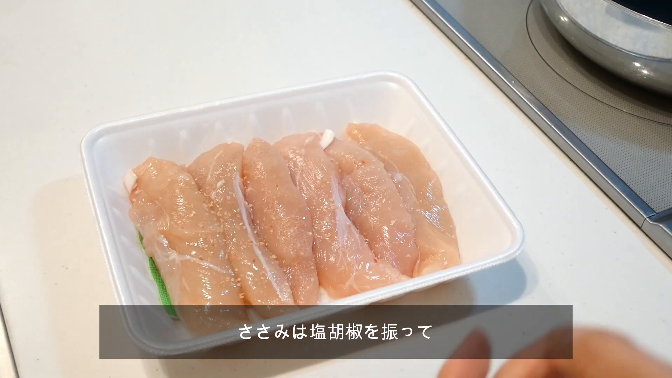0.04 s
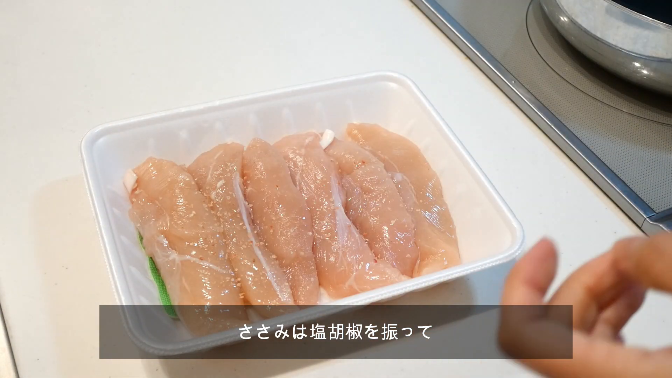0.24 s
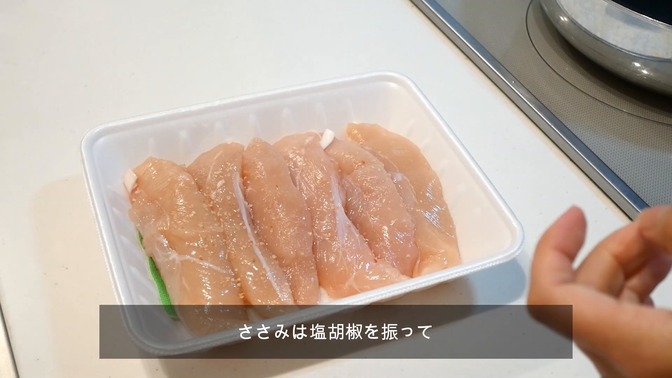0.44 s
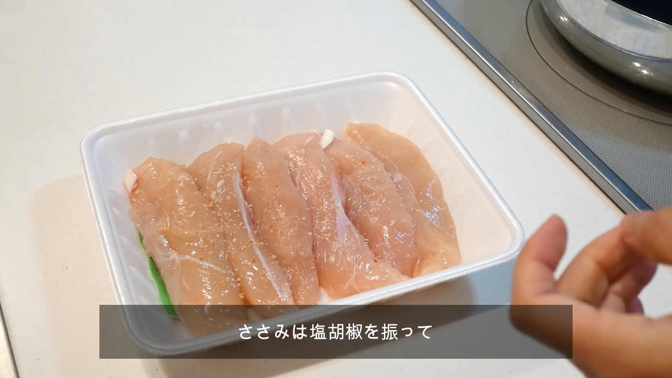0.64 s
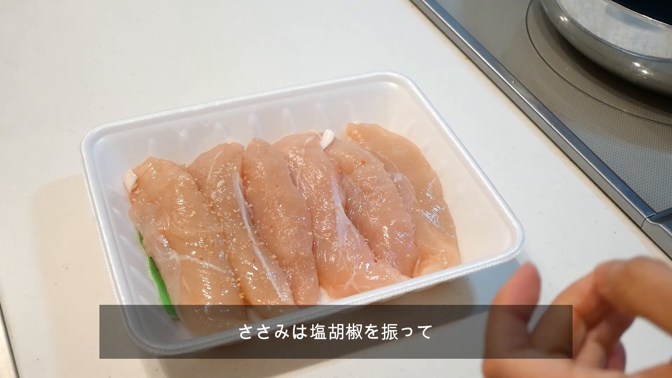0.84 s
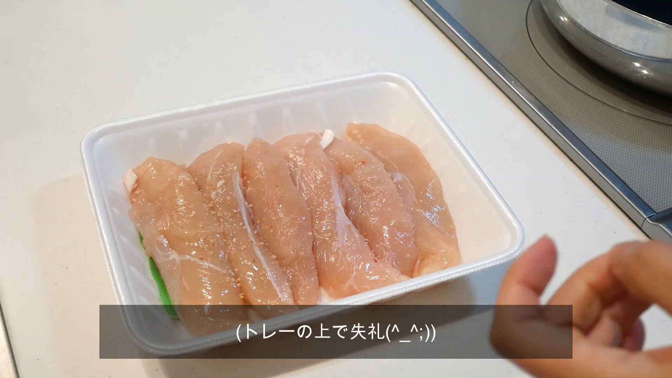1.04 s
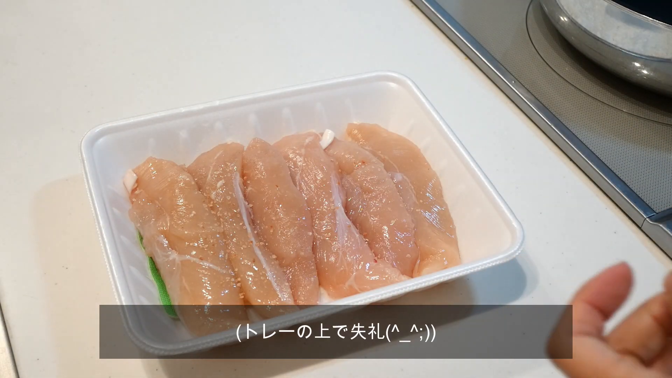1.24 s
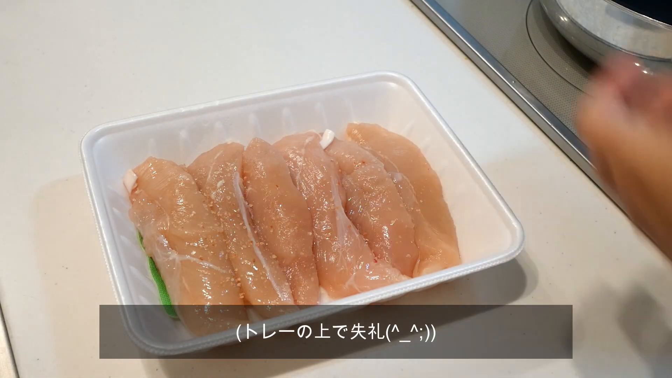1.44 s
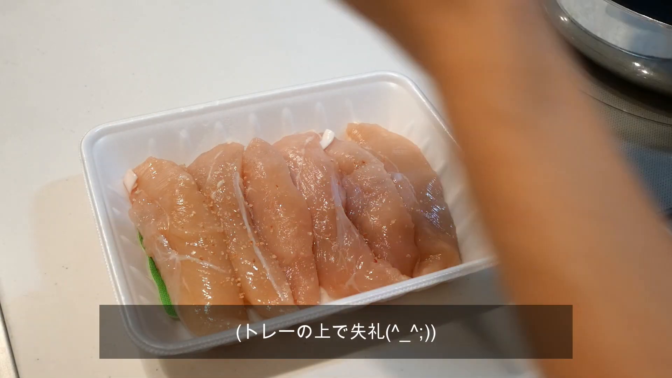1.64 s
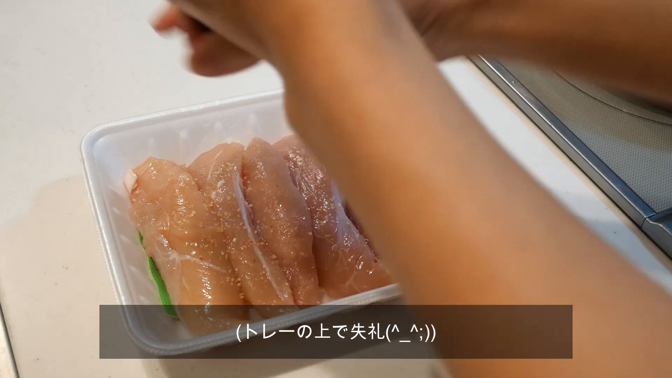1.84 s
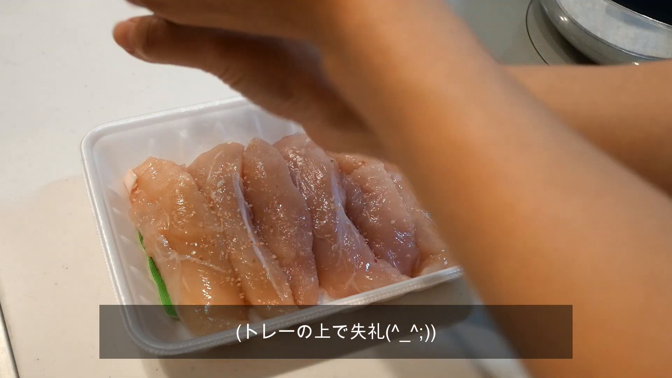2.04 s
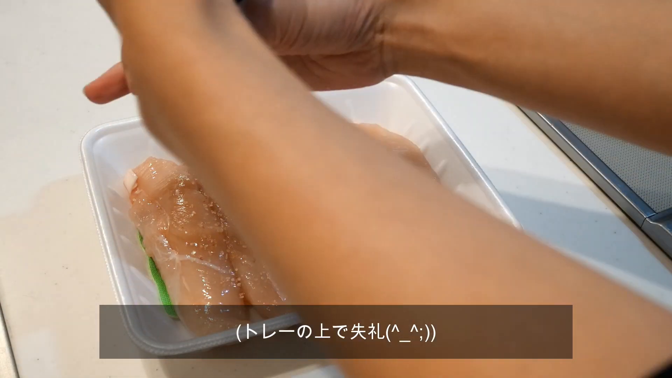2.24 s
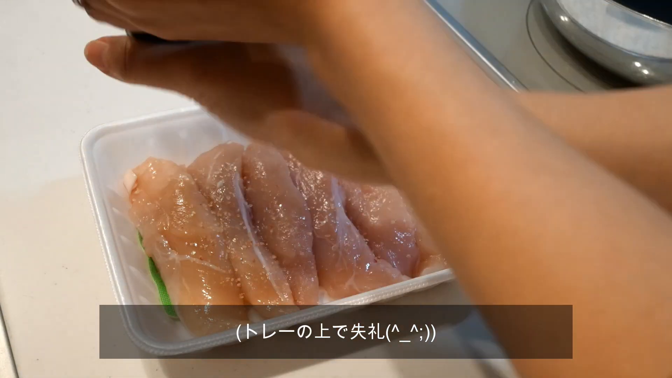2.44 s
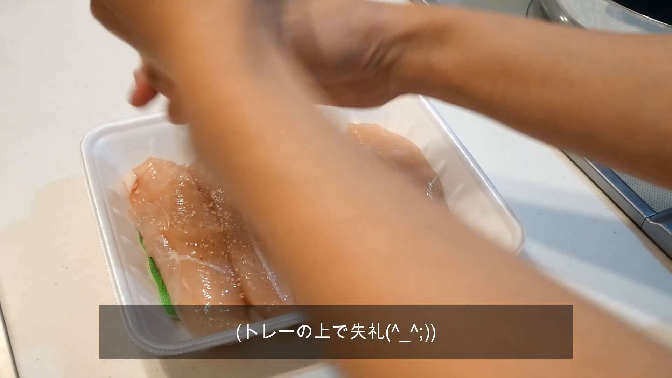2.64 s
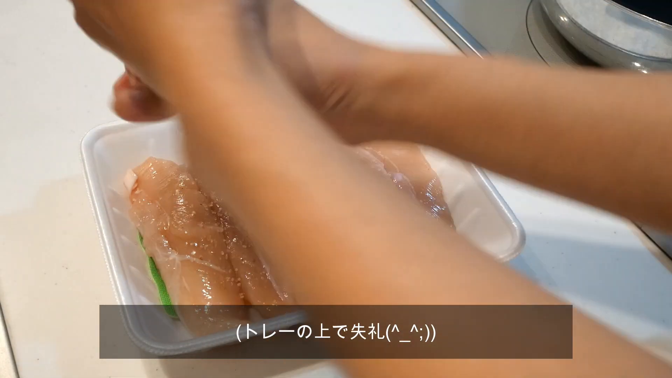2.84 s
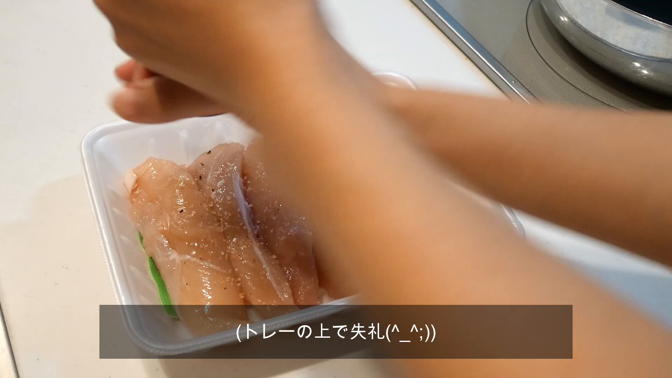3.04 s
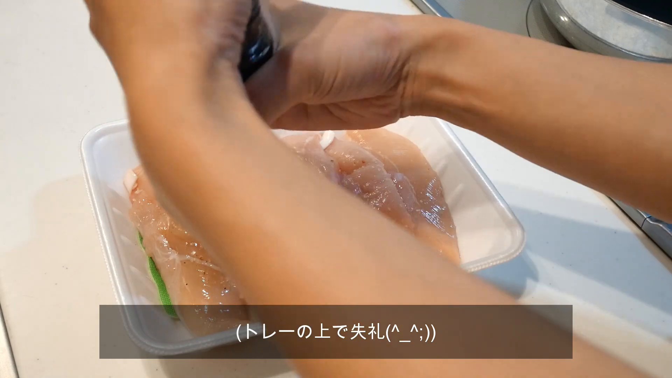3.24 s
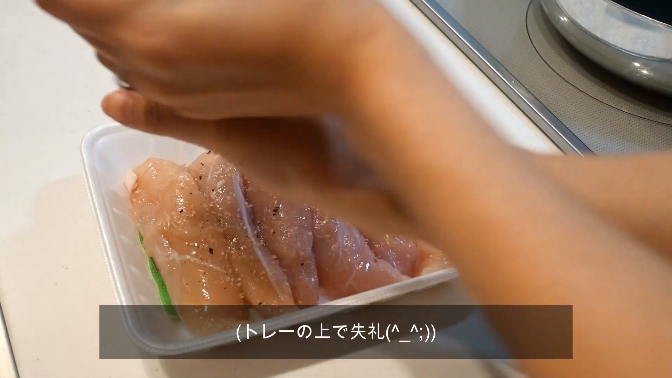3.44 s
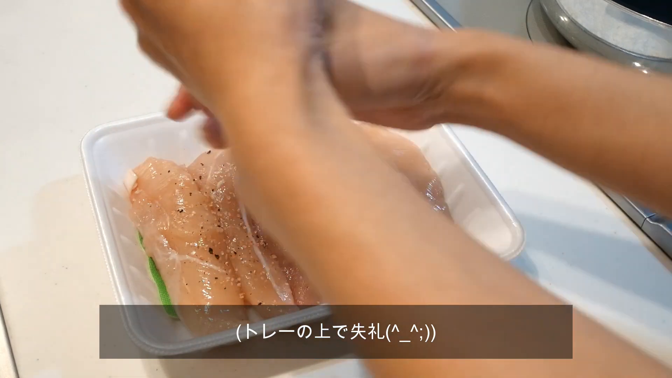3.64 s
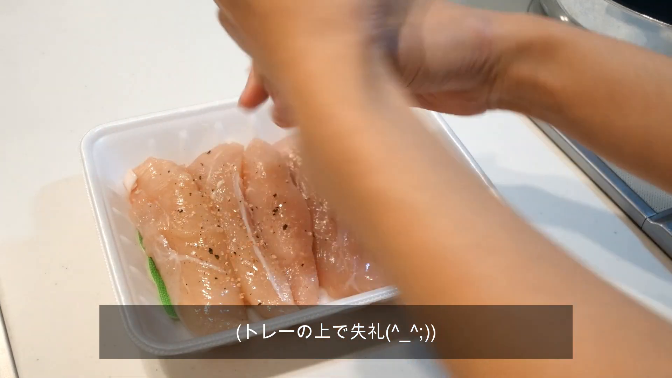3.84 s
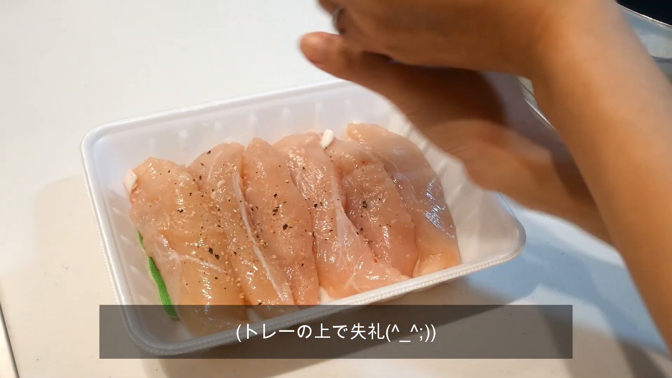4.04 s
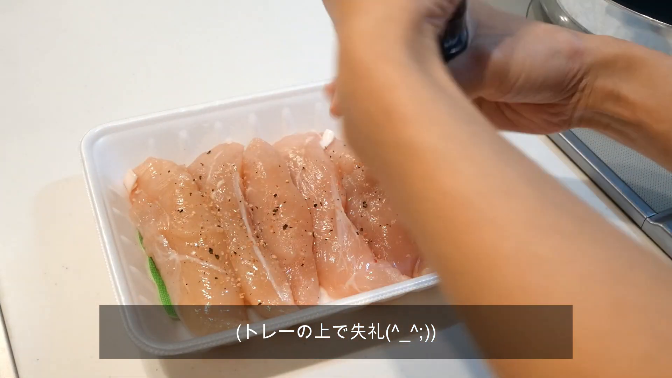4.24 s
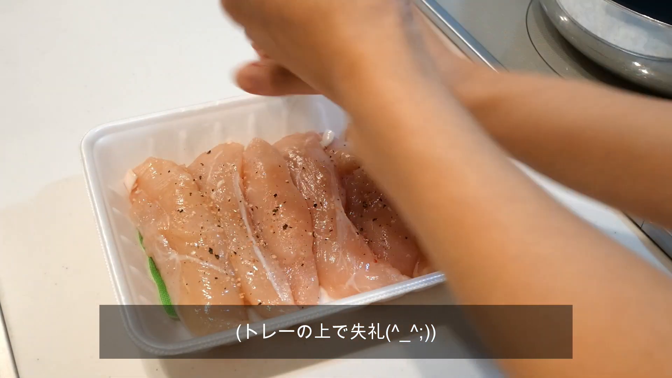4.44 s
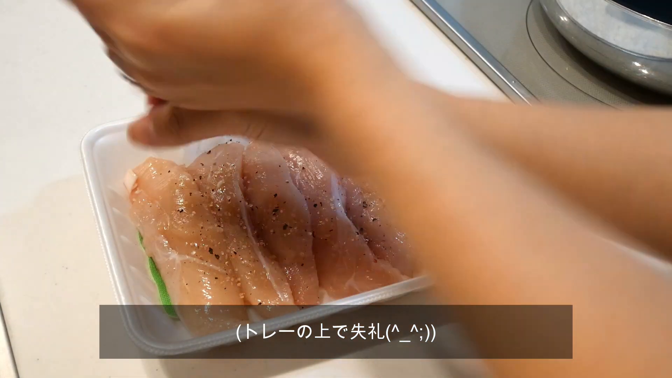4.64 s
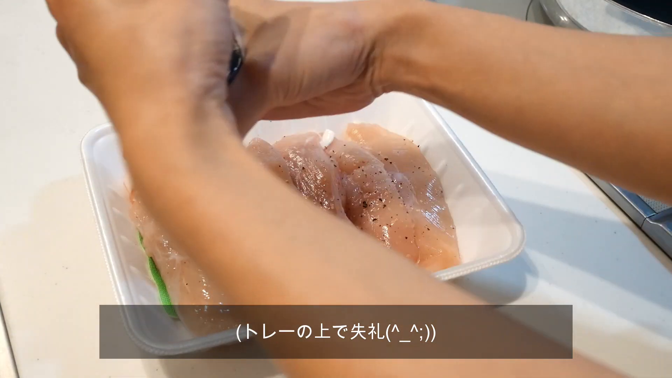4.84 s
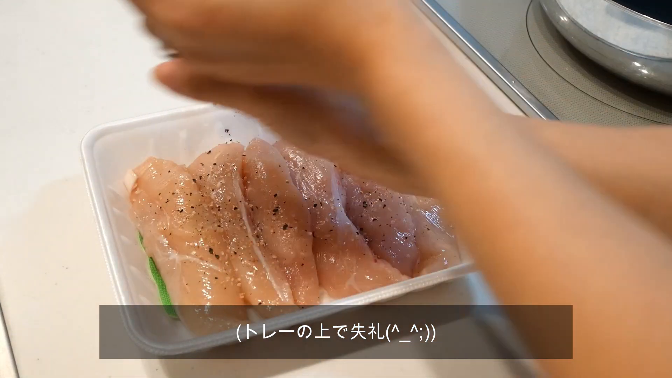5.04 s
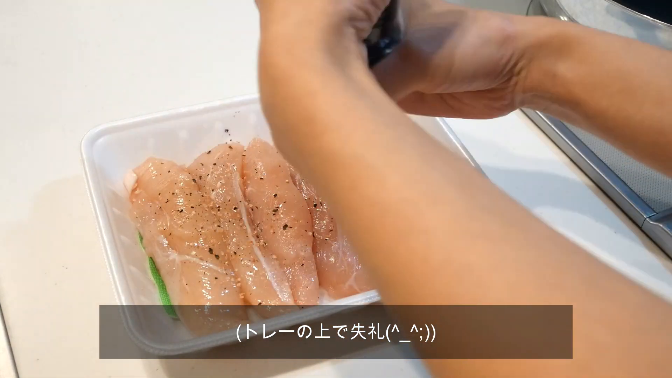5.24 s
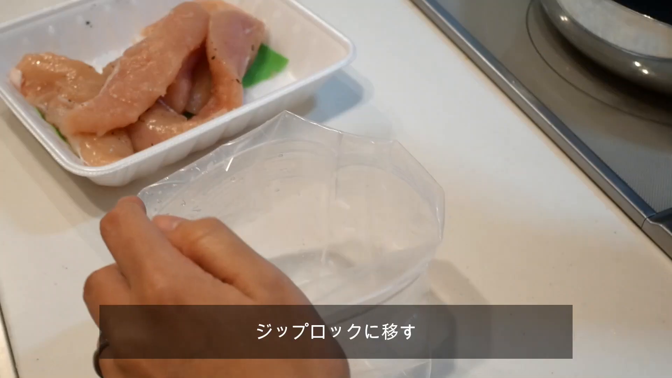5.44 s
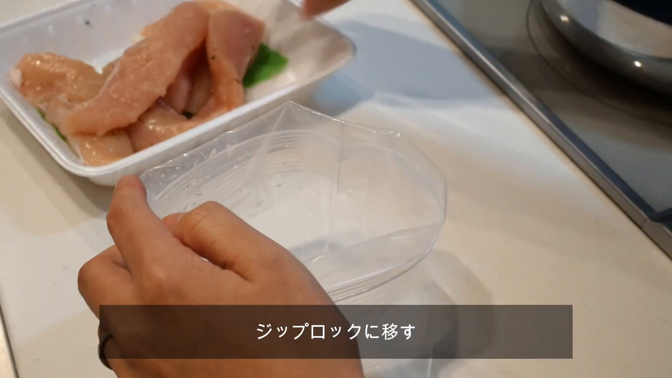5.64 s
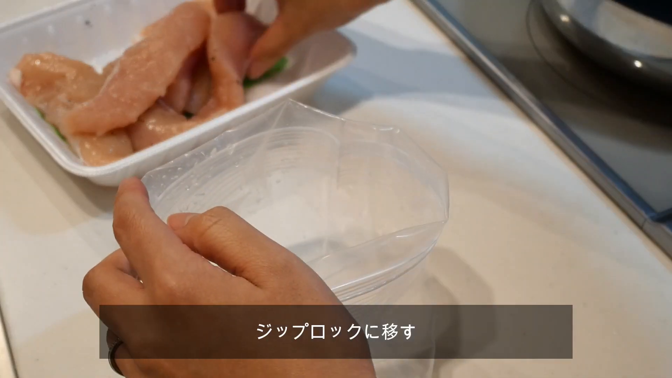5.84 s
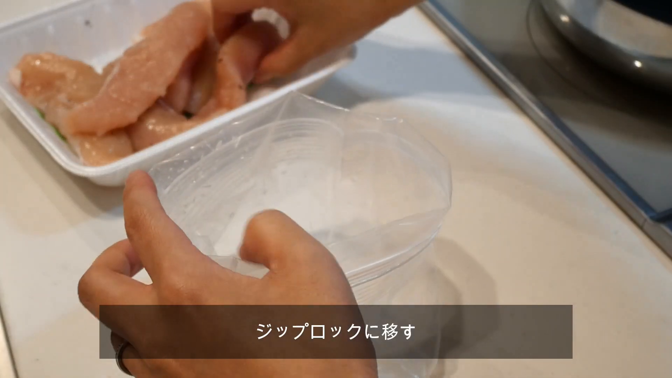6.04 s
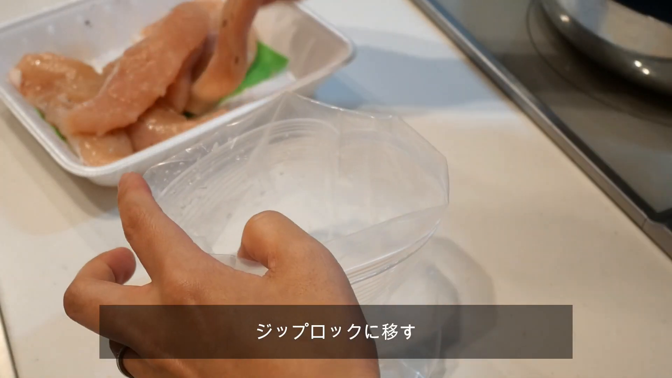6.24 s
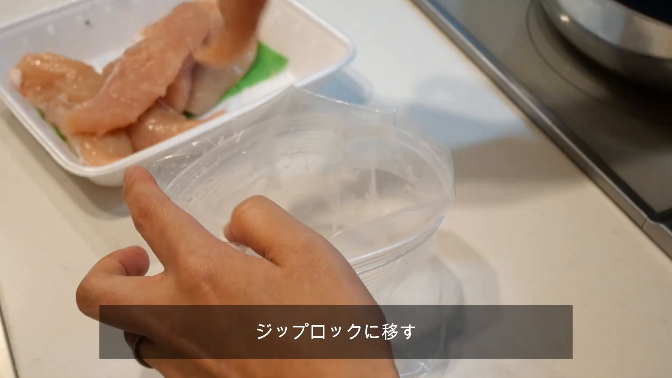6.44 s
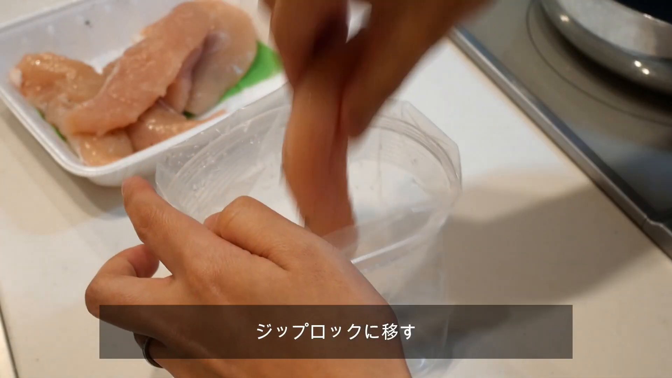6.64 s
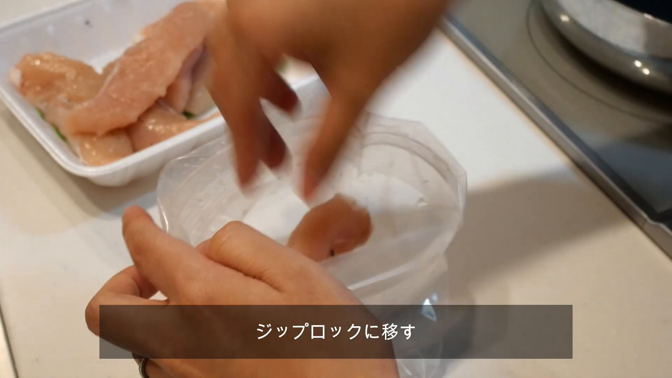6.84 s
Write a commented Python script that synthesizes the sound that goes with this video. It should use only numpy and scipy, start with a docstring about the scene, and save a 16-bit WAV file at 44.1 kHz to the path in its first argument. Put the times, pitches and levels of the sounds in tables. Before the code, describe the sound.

A hand pepper mill grinds close to the microphone in eight short, brittle strokes, each followed by a softer turn back. Before it come a few dull knocks, a faint scrape on a kitchen counter and the hiss of shifting peppercorns. The sound cuts out briefly after the grinding, then returns with light ticks from a plastic bag. A low, quiet ventilation hum fills the small room.

```python
"""Pepper mill in a kitchen

Knocks ring a counter and something is dragged across it. Corns slide in a tipped mill, which is twisted
about twice a second: eight strokes crunch by brittle fracture, with soft friction on the returns. After
a moment of dead silence a plastic bag ticks as its creases buckle. Ventilation hums quietly."""
import sys
import numpy as np
from scipy import signal
from scipy.fft import rfft, irfft
from scipy.io import wavfile
from scipy.ndimage import uniform_filter1d

SR = 44100
rng = np.random.default_rng(int(sys.argv[2]) if len(sys.argv) > 2 else 0)


def store_wav(level_fs):
    """Save 16-bit WAV to argv[1]."""
    pcm = np.round(np.clip(np.atleast_2d(level_fs), -1, 1) * 32767)
    wavfile.write(sys.argv[1], SR, pcm.T.astype(np.int16))


N = 304290
T = np.arange(N) / SR
CUTOFF_HZ = 16000


# Spectra of crushing and of free gliding. Each row: frequency in Hz, spectral density in dB.
CRUNCH_COLOUR = [(100, -20), (350, -14.5), (750, -17.5), (1100, -8), (1700, -3), (2600, 0), (3600, 2),
                 (5200, -2.5), (7500, -4.5), (11000, -7), (15500, -12)]
GLIDE_COLOUR = [(200, -18), (800, -9.5), (1400, 3), (2500, 7.5), (3700, 8), (5200, 4), (8000, -5),
                (15000, -39)]
# Their resonances. Each row: frequency in Hz, width in Hz, level in dB.
CRUNCH_PEAKS = [(361.1, 79, -7.5), (505, 60, -12.5), (1340, 230, -10), (1638, 98, 4), (1830, 130, -1.5),
                (2390, 150, -12), (3130, 67, -12.5), (3370, 130, -3), (4177, 410, -9), (4640, 240, -5.5)]
GLIDE_PEAKS = [(1670, 110, 5)]
def mill():
    """Friction and fracture: lightly loaded burrs glide; past a threshold they crush the grains."""
    body, effort_db = response(CRUNCH_COLOUR, CRUNCH_PEAKS), effort()
    bite = 1 / (1 + from_db(-1.4 * (effort_db + 34)))   # share of the power that goes into crushing
    crushing = grains(effort_db, density=2200, spread_db=2.5, clump_db=8.5) * np.sqrt(bite)
    friction = grains(effort_db, density=12000, spread_db=0, clump_db=5) * np.sqrt(1 - bite)
    bites_s, _, _, tilts_db, *_ = np.transpose(TWISTS)
    crunch = brighten(through(crushing, body), np.interp(T, bites_s, tilts_db), corner_hz=8000)
    glide = through(friction, response(GLIDE_COLOUR, GLIDE_PEAKS))
    brittle = body - low_pass(body, 800)   # a fracture carries little bass
    grinding = from_db(-8) * crunch + from_db(-8.5) * glide
    return grinding + mill_mouth(friction) + chips(brittle) + cracking_corns(brittle)


# Forward twists. Each row: time of full bite and hold in seconds, level and brightness in dB,
# length of the glide before the bite in seconds, its level in dB.
TWISTS = [(1.822, 0.043, -28.5, 9.5, .03, -54), (2.233, 0.023, -35.5, 2, 0.093, -44),
          (2.701, 0.047, -27, 1.5, 0.095, -47.5), (3.16, 0.033, -28.5, 3.5, .04, -56),
          (3.678, 0.026, -24, -4, .07, -50), (4.276, 0.025, -24, 8, .14, -45.5),
          (4.728, 0.068, -35.5, 9, .05, -67), (5.255, 0.039, -23.5, 5, .075, -49.5)]
# Easy turns back. Each row: start and hold in seconds, level in dB, mouth note in Hz, its gain in dB.
RETURNS = [(1.92, 0.13, -43, 1705, -15), (2.388, 0.14, -40.5, 1650, -15), (2.883, 0.15, -41, 1715, -19.5),
           (3.401, 0.12, -39, 1620, -14), (3.913, 0.14, -39.5, 1655, -17),
           (4.412, 0.21, -45.5, 1640, -12.5), (4.984, 0.11, -40, 1635, -15)]
TWIST_DB_PER_S = (382.5, 269.5)   # rise, fall
def effort():
    """The load on the burrs, in dB, is the power sum of twists, glides and crumbs being ground."""
    twists = [db + push_db(T - s, hold, *TWIST_DB_PER_S) for s, hold, db, *_ in TWISTS]
    take_ups = [(s - lead, lead, db) for s, *_, lead, db in TWISTS]
    glides = [db + glide_db(T - s, hold) for s, hold, db, *_ in list(RETURNS) + take_ups]
    broken = np.zeros(N)
    for s, db, _ in CORN_CRACKS:
        broken[int(s * SR)] += from_db(db - 15.5) ** 2
    decay = from_db(-520 / SR) ** 2   # the crumbs fade at 520 dB per second
    crumbs = 10 * np.log10(signal.lfilter([1], [1, -decay], broken + 1e-18))
    return power_sum(twists + glides + [crumbs])


def glide_db(t, hold_s):
    """Friction noise grows with speed, so a free turn peaks midway, where the hand is fastest."""
    slowness = 1 - np.sin(np.pi * np.clip(t / hold_s, 0, 1))
    return push_db(t, hold_s, rise_db_per_s=1200, fall_db_per_s=400) - 7 * slowness


# Whole corns breaking. Each row: start in seconds, relative level in dB, brightness in dB.
CORN_CRACKS = [(2.1972, -26, 5), (2.232, -19, -9), (2.2467, -15, -6), (2.6448, -31, 0), (2.658, -26.5, 4),
               (2.687, -28, -11), (2.7016, -16.5, -9), (2.731, -12, -13), (2.754, -18, -7),
               (3.12, -25.5, -7), (3.125, -23, -9), (3.138, -24, 8), (3.146, -15.5, 4), (3.159, -17, -1),
               (3.188, -20.5, -6), (3.1927, -12.5, -5.5), (3.6328, -26, -2), (3.6523, -10, -4.5),
               (3.6588, -5, -2), (3.676, -15, 9), (3.7413, -9.5, -4), (3.7552, -9, 2.5), (4.1831, -26, 0),
               (4.2015, -30.5, 8.5), (4.21, -13, 9), (4.216, -25, -1.5), (4.2554, -8, 9.5),
               (4.273, -4.5, -1), (4.518, -38, -12), (4.7229, -29, -11), (4.7356, -13, 10),
               (4.7612, -17.5, -19.5), (4.767, -19.5, 13), (4.778, -18, 3.5), (4.803, -22.5, 21.5),
               (4.8154, -12, 14), (5.206, -26.5, 19), (5.2244, -21.5, -1.5), (5.249, -9, -3.5),
               (5.2765, -12.5, 19.5)]
# Modes of the hand-held mill. Each row: frequency in Hz, level in dB, T60 in seconds.
JOLT_MODES = [(355, -3.5, 0.053), (420, -5.5, 0.025), (505, -5.5, 0.035), (830, -6, 0.03)]
def cracking_corns(body):
    """Brittle fracture releases the load at once; a big corn giving way shakes the whole mill."""
    out = np.zeros((2, N))
    for s, db, bright_db in CORN_CRACKS:
        add(out, s, snap(body, db - 5.5, bright_db, length_s=0.001))
        jolt = ringing(JOLT_MODES, spread_db=1.5, detune=0.05, count=4000)   # the grip varies the modes
        jolt_db = 1.57 * db - 0.52 * bright_db - 24.5
        add(out, s, from_db(jolt_db) * low_pass(jolt, 820, order=2))
    return out


def chips(body, per_twist=4):
    """Small fractures fall at random around each bite, weaker while the load is still building."""
    out = np.zeros((2, N))
    for s, hold, db, *_ in TWISTS:
        for t in rng.uniform(-0.03, hold, per_twist):
            grip_db = push_db(t, hold, *TWIST_DB_PER_S)
            add(out, s + t, snap(body, db + 0.5 + grip_db, bright_db=3.5, length_s=0.001))
    return out


def mill_mouth(friction, width_hz=70):
    """Cavity resonance: friction rings the air in the mill's mouth, at a note that shifts with grip."""
    s, hold, _, hz, db = np.transpose(RETURNS)
    note_hz, gain_db = np.interp(T, s + hold / 2, hz), np.interp(T, s + hold / 2, db)
    carrier = np.exp(2j * np.pi * np.cumsum(note_hz) / SR)
    ring = np.real(low_pass(friction / carrier, width_hz / 2) * carrier)   # a moving band-pass
    return from_db(gain_db) * ring * 2 * np.sqrt(SR / (np.pi * width_hz))


# Spectrum of the jar wall. Each row: frequency in Hz, spectral density in dB.
JAR_COLOUR = [(300, -29), (1200, -15), (2000, -14), (3000, -5), (4200, 1), (5100, -0.5), (6200, -0.5),
              (7500, -8.5), (9500, -6.5), (15500, -14)]
# Its resonances. Each row: frequency in Hz, width in Hz, level in dB.
JAR_PEAKS = [(3300, 250, -15), (5050, 250, -2), (7300, 1100, -8)]
# The heap shifting. Each row: time of full flow, rise and hold in seconds, relative level in dB.
CORN_SLIDES = [(1.35, 0.056, 0.059, -40.5), (1.481, 0.044, 0.022, -43.5), (1.63, 0.26, 0.083, -49.5),
               (1.72, 0.0074, .008, -33.5), (1.775, 0.0046, 0.097, -28.5), (3.503, 0.07, 0.048, -47.5),
               (4.433, .06, 0.036, -47.5), (4.671, 0.0058, 0.02, -44.5), (4.75, 0.027, 0.051, -41.5)]
# Single corns hitting the wall. Each row: start in seconds, relative level in dB.
CORN_DROPS = [(1.325, -45), (1.633, -33), (1.6587, -35.5), (1.952, -41), (2.114, -43.5), (2.314, -32.5),
              (3.5795, -28.5), (3.612, -31.5), (4.417, -30), (4.657, -40), (4.681, -30), (4.69, -28),
              (4.869, -25), (5.133, -40.5), (5.186, -34.5), (5.346, -29), (5.419, -35)]
def jar():
    """Granular flow: the many impacts of sliding corns merge into a hiss; single ones tick."""
    wall = response(JAR_COLOUR, JAR_PEAKS)
    flow_db = power_sum([db + push_db(T - s, hold, rise_db_per_s=15 / rise, fall_db_per_s=233)
                         for s, rise, hold, db in CORN_SLIDES])
    out = from_db(-7) * through(grains(flow_db, density=14000, spread_db=0, clump_db=4.5), wall)
    for s, db in CORN_DROPS:
        add(out, s, snap(wall, db - 5.5, bright_db=3, length_s=0.00099))
    return out


# Blows on the counter. Each row: start in seconds, relative level in dB, cut-off in Hz, click in dB.
COUNTER_KNOCKS = [(0.1975, -22, 1280, -24.5), (0.204, -41, 790, -47), (0.248, -31, 400, -65),
                  (0.286, -20.5, 377, -31), (0.514, -42, 400, -68), (1.002, -41.5, 800, -47.5)]
# Modes of the counter and of a hollow object. Each row: frequency in Hz, level in dB, T60 in seconds.
COUNTER_MODES = [(65.4, -15, 0.15), (146, -12.5, 0.09), (267.4, -8.5, 0.13), (291.6, 1, 0.087),
                 (334, 1, 0.05), (367, -9.5, 0.08), (482, -7.5, 0.09), (517, -9, 0.06), (554, 2.5, 0.076),
                 (688, -6.5, 0.077), (855, -16.5, 0.07), (970, -22, 0.08)]
BUMP_MODES = [(112.5, -14, 0.35), (264, -8, 0.16), (310, 3.5, 0.11), (432, -0.5, 0.11)]
# Spectrum of a contact. Each row: frequency in Hz, spectral density in dB.
CLICK_COLOUR = [(60, 0.5), (250, 8.5), (900, 3), (1600, -5.5), (2700, -4), (4200, -4.5), (7000, -16.5),
                (15000, -24.5)]
# A brief scuff. Each row: time in seconds, relative level in dB.
SCUFF_LEVELS = [(0.998, -65), (1.008, -52.5), (1.035, -59), (1.05, -54), (1.085, -62), (1.15, -62.5),
                (1.2, -88)]
def knocks():
    """Soft impacts excite mainly low modes, each with a click; one scuffs on into a hollow bump."""
    ring, click = ringing(COUNTER_MODES), response(CLICK_COLOUR)
    scuff = grains(curve(SCUFF_LEVELS), density=7200, spread_db=5.5, clump_db=5.5)
    out = from_db(-2) * through(scuff, click)
    for s, db, soft_hz, click_db in COUNTER_KNOCKS:
        add(out, s, from_db(db - 8) * low_pass(ring, soft_hz, order=2))
        add(out, s, snap(click, click_db, bright_db=0, length_s=0.0047))
    bump_s = 1.092
    add(out, bump_s, from_db(-41) * low_pass(ringing(BUMP_MODES), 530, order=2))
    add(out, bump_s, snap(click, db=-46, bright_db=0, length_s=0.0038))
    return out


# Something drawn across the counter. Each row: time in seconds, relative scrape and ring levels in dB.
DRAG_LEVELS = [(0.25, -79, -70), (0.36, -55, -49), (0.42, -58, -49.5), (0.48, -57.5, -68),
               (0.525, -53, -50.5), (0.59, -56.5, -47), (0.62, -57, -59.5), (0.7, -63.5, -61),
               (0.99, -101, -77)]
# Spectrum of the scrape. Each row: frequency in Hz, spectral density in dB.
SCRAPE_COLOUR = [(300, 5), (1100, 0.5), (1700, -8), (2700, -8), (4200, -8.5), (7000, -13.5), (15000, -25)]
# Its resonances. Each row: frequency in Hz, width in Hz, level in dB.
SCRAPE_PEAKS = [(1295, 430, -11.5), (2150, 170, -7.5), (2960, 200, -7.5), (3404, 210, -2.5),
                (4700, 250, -12)]
def drag_scrape():
    """Sliding friction: a dense train of tiny contacts makes a faint scrape."""
    contacts = grains(curve(DRAG_LEVELS), density=8100, spread_db=0.5, clump_db=0)
    return from_db(-3) * through(contacts, response(SCRAPE_COLOUR, SCRAPE_PEAKS))


def drag_ring():
    """Friction sustains one mode, unsteady in pitch and strength because it grips unevenly."""
    pitch_hz = 652 + 5.5 * wander(20)
    level_db = curve(DRAG_LEVELS, column=2) + 2.5 * wander(45.4)
    return np.sin(2 * np.pi * np.cumsum(pitch_hz) / SR) * from_db(level_db)


# Spectrum of the plastic film. Each row: frequency in Hz, spectral density in dB.
FILM_COLOUR = [(150, -17), (700, -19.5), (1100, -5.5), (1600, -13), (3200, -4), (4800, -2), (7000, -8.5),
               (10000, -14.5), (15000, -19)]
# Its rustle under the fingers. Each row: time in seconds, relative level in dB.
RUSTLE_LEVELS = [(5.63, -70), (5.8, -74), (5.95, -78), (6.13, -74), (6.45, -72), (6.65, -83), (6.76, -71),
                 (6.9, -56)]
# Creases flipping over. Each row: start in seconds, relative level in dB, brightness in dB.
CREASE_SNAPS = [(6.079, -56, -12), (6.1368, -48.5, -5), (6.224, -52, 12), (6.321, -55, -20),
                (6.767, -59, 3), (6.8214, -23.5, -17), (6.829, -39, 17), (6.855, -36, -6),
                (6.8602, -21, -11)]
def bag():
    """Buckling: thin plastic rustles faintly, and single creases snap through with a tick."""
    film = response(FILM_COLOUR)
    contacts = grains(curve(RUSTLE_LEVELS), density=9000, spread_db=0.5, clump_db=5)
    out = from_db(-9.5) * brighten(through(contacts, film), 6.7)
    for s, db, bright_db in CREASE_SNAPS:
        add(out, s, snap(film, db - 5, bright_db, length_s=0.0012))
    return out


# Spectrum of the ventilation. Each row: frequency in Hz, spectral density in dB.
AIR_COLOUR = [(15, -26), (25, -12.5), (74, -15), (108, 0.5), (130, -21.5), (180, -4), (217, -12), (309, -4),
              (373, -9), (463, -6.5), (659, -14.5), (1040, -16.5), (1190, -23.5), (5280, -33),
              (16000, -37.5)]
def ventilation():
    """Moving air gives steady broadband noise, and the motor adds a wavering tone."""
    noise = ports(rng.standard_normal((2, N)), split_hz=1200)
    air = rms_one(through(noise, response(AIR_COLOUR, size=8192)))
    hum_hz = 111.4 + 2.7 * wander(2)
    hum = np.sqrt(2) * np.sin(2 * np.pi * np.cumsum(hum_hz) / SR)
    return from_db(-60.5) * air + from_db(-75.5) * hum


# Decay of the kitchen. Each row: frequency in Hz, T60 in seconds.
ROOM_T60 = [(150, 0.32), (600, 0.26), (2000, 0.21), (6000, 0.28), (15000, 0.27)]
# Reflections from counter and wall. Each row: nominal delay in seconds, left gain, right gain.
EARLY_ECHOES = [(.0068, .22, 0.15), (.0085, -0.19, 0.25)]
def room_response(wet_db, count=22050):
    """Reverberation: early reflections and a diffuse tail, coherent between ports only in the bass."""
    t, tail = np.arange(count) / SR, 0
    noise, hz = rfft(rng.standard_normal((2, count))), np.fft.rfftfreq(count, 1 / SR)
    edges_hz = 30 * 2.0 ** np.arange(11)
    for low, high in zip(edges_hz, edges_hz[1:]):
        mid, side = irfft(noise * ((hz >= low) & (hz < high)), count)
        centre = np.sqrt(low * high)
        alike = 1 / (1 + (centre / 2600) ** 2)
        band = np.sqrt((1 + alike) / 2) * mid + np.sqrt((1 - alike) / 2) * side * np.array([[1], [-1]])
        tail = tail + band * from_db(-60 * t / at_hz(ROOM_T60, centre))
    impulse = from_db(wet_db) * rms_one(tail * np.clip(t / 0.0011, 0, 1)) / np.sqrt(count)
    for delay, left, right in EARLY_ECHOES:
        impulse[:, int(delay * rng.uniform(0.93, 1.07) * SR)] += [left, right]
    return impulse


def kitchen(x, wet_db, paths=4):
    """Room paths depend on position: as the hands move, the sound crossfades through several sets."""
    out, place = x, 2.7 * T
    for k in range(paths):
        away = np.minimum(np.abs((place - k + paths / 2) % paths - paths / 2), 1)
        out = out + through(x * np.cos(np.pi / 2 * away), room_response(wet_db))
    return out


def grains(level_db, density, spread_db, clump_db):
    """Shot noise: clumped random contacts, density per second at -36.5 dB and more when louder."""
    rate = density * from_db(0.38 * (level_db + 36.5))
    born = rng.random(N) < rate / SR
    clumps = from_db(clump_db * wander(69))
    sizes = born * clumps * from_db(spread_db * np.minimum(rng.exponential(1, N), 4))
    local_rms = np.sqrt(np.abs(uniform_filter1d(sizes ** 2, size=900)) + 1e-4)
    return ports(sizes / local_rms * rng.choice([-1, 1], (2, N))) * from_db(level_db)


def snap(body, db, bright_db, length_s, count=1400):
    """Impulsive excitation: a noise burst rings a body, with the energy of level db held for 1.5 ms."""
    t = np.arange(count) / SR
    noise = ports(rng.standard_normal((2, count)), split_hz=6500)
    burst = noise * np.sqrt(t / length_s) * np.exp(-t / length_s)
    sound = low_pass(brighten(through(burst, body), 1.2 * bright_db), 11000)
    return from_db(db) * rms_one(sound) * np.sqrt(0.0015 * SR / count)


def ringing(modes, spread_db=0, detune=0, count=13000):
    """Damped modes: pressure follows the surface's acceleration, so each starts at its peak."""
    t = np.arange(count) / SR
    return sum(from_db(db + spread_db * a - 60 * t / t60) * np.cos(2 * np.pi * hz * (1 + detune * b) * t)
               for (hz, db, t60), (a, b) in zip(modes, rng.standard_normal((len(modes), 2))))


def response(colour, resonances=(), size=2048):
    """Minimum-phase, unit-energy impulse response of a body with a broad colour and resonant peaks."""
    hz = np.fft.rfftfreq(size, 1 / SR)
    power = from_db(at_hz(colour, hz)) ** 2
    for centre, width, db in resonances:
        power += 4 * from_db(db) ** 2 / (1 + ((hz - centre) / width) ** 2) ** 2
    power /= 1 + (hz / CUTOFF_HZ) ** 40
    cepstrum = irfft(np.log(power) / 2)
    cepstrum[1:size // 2] *= 2   # folding the cepstrum makes the response causal
    cepstrum[size // 2 + 1:] = 0
    impulse = irfft(np.exp(rfft(cepstrum)))
    return impulse / np.linalg.norm(impulse)


def ports(draws, split_hz=5000):
    """Coherence falls with frequency: two microphone ports share the bass and differ in the treble."""
    side = draws[1] - low_pass(draws[1], split_hz)
    return draws[0] + 1.14 * side * np.array([[1], [-1]])


def push_db(t, hold_s, rise_db_per_s, fall_db_per_s):
    """Exponential attack up to t = 0, a hold at 0 dB, exponential release."""
    return np.maximum(rise_db_per_s * np.minimum(t, 0) - fall_db_per_s * np.maximum(t - hold_s, 0), -140)


def power_sum(levels_db):
    """Incoherent sources add in power."""
    return 10 * np.log10(sum(from_db(db) ** 2 for db in levels_db) + 1e-14)


def wander(hz):
    """Low-passed random fluctuation of unit rms."""
    return rms_one(low_pass(rng.standard_normal(N), hz, order=2))


def brighten(x, db, corner_hz=3200):
    """Spectral tilt of treble against bass about a corner."""
    low = low_pass(x, corner_hz)
    return low * from_db(-db / 2) + (x - low) * from_db(db / 2)


def low_pass(x, hz, order=1):
    """Maximally flat low-pass."""
    return signal.sosfilt(signal.butter(order, hz, fs=SR, output="sos"), x)


def through(x, impulse):
    """Convolution of stereo sound with an impulse response."""
    return signal.fftconvolve(x, np.atleast_2d(impulse), axes=-1)[:, :x.shape[-1]]


def add(out, s, sound):
    """Superposition of a sound starting at s seconds."""
    i = int(round(s * SR))
    out[:, i:i + sound.shape[-1]] += sound[..., :N - i]


def curve(rows, column=1):
    """A level curve in dB, silent outside its span."""
    rows = np.array(rows)
    return np.interp(T, rows[:, 0], rows[:, column], left=-140, right=-140)


def at_hz(points, hz):
    """Interpolation on a log-frequency axis."""
    points = np.array(points)
    return np.interp(np.log(np.maximum(hz, 1)), np.log(points[:, 0]), points[:, 1])


def from_db(db):
    """Decibels to gain."""
    return 10 ** (np.asarray(db) / 20)


def rms_one(x):
    """Scaling to unit rms."""
    return x / np.sqrt(np.mean(x ** 2) + 1e-20)


def scene():
    """Level differences give direction: the mill's treble leans left, the counter sounds right."""
    pepper = brighten(mill() + jar(), np.array([[1.0], [-1.0]])) * from_db([[0.1], [-0.1]])
    near = pepper + bag()
    counter = (knocks() + drag_scrape()) * from_db([[-0.9], [0.9]])
    return kitchen(near, wet_db=-3) + kitchen(counter, wet_db=0.5) + drag_ring() + ventilation()


def record(dry):
    """Gating and band-limiting: the sound drops out for 0.2 s, and the top treble is cut."""
    gate = uniform_filter1d(((T < 5.432) | (T > 5.632)) * 1.0, size=128)
    return signal.sosfilt(signal.ellip(10, 0.1, 80, CUTOFF_HZ, fs=SR, output="sos"), dry * gate)


dry = scene()
out = record(dry)
store_wav(out)
```